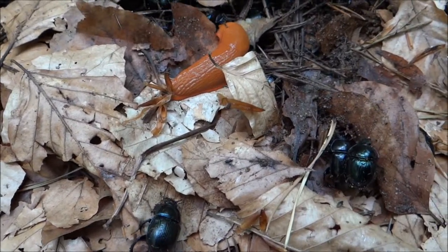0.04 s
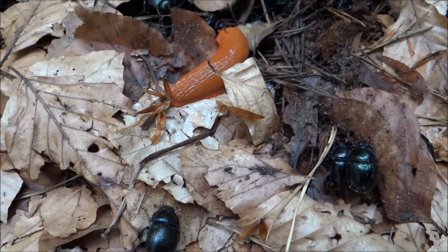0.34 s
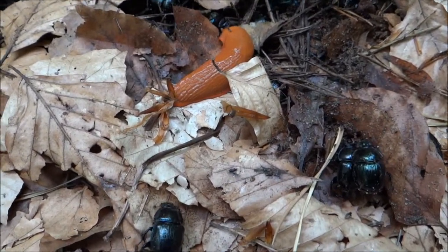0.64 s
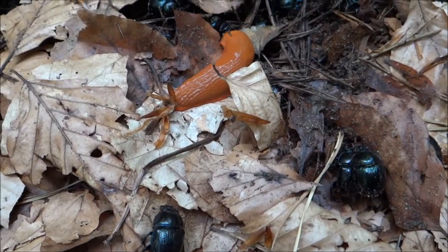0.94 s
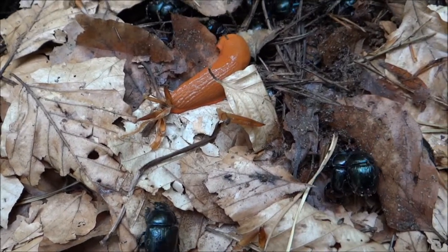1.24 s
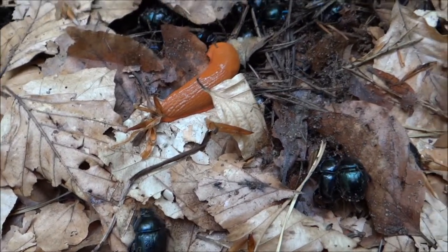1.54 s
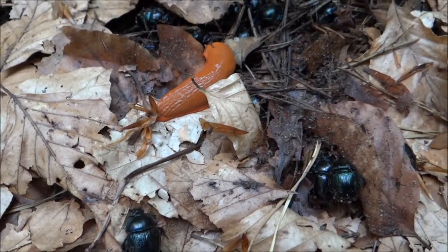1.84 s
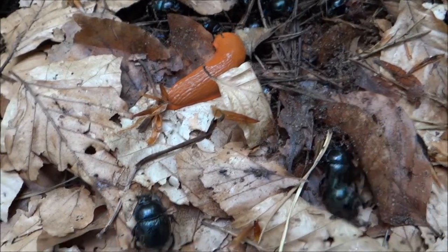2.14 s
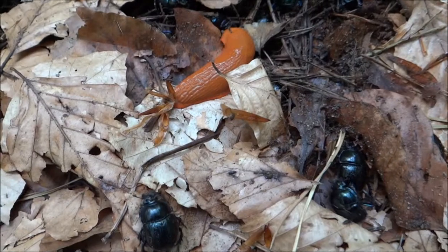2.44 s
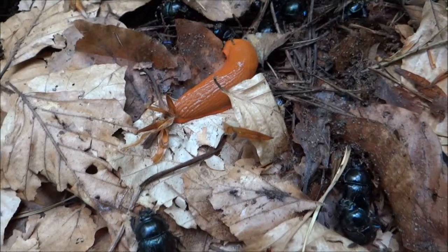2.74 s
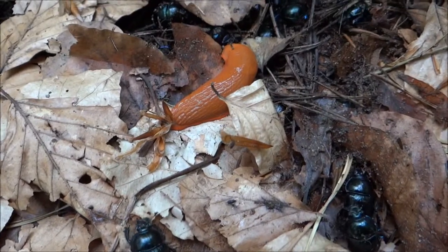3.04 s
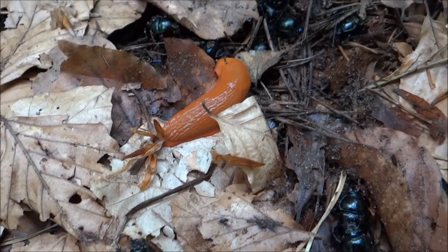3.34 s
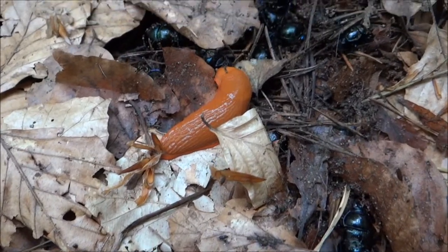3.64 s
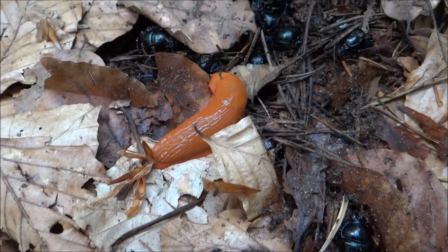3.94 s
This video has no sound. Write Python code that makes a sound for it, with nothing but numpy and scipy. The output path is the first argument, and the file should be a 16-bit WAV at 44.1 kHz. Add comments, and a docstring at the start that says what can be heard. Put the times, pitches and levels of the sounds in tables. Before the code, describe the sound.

A finch sings in a wood, its thin chirps growing into warbles, a loud falling trill and a buzzy flourish. A distant dry rattle comes first, and beetles faintly rustle fallen leaves close by over a low rumble.

```python
"""A finch in a wood

A finch sings a little to the right: seven thin chirps, warbled notes, a loud falling trill and a buzzy
flourish. Each is a nearly pure tone sliding in pitch, and the trunks scatter it into echoes.
Farther off come a dry rattle (pulsing hiss) and two thin whistles. Close by, beetles rustle
the fallen leaves. A low rumble and quiet air lie under it all."""
import sys
import numpy as np
from scipy import signal
from scipy.fft import rfft, irfft
from scipy.io import wavfile
from scipy.ndimage import uniform_filter1d

SR = 44100
rng = np.random.default_rng(int(sys.argv[2]) if len(sys.argv) > 2 else 0)


def int16_out(signal):
    """Quantize to a 16-bit WAV file."""
    q = np.round(np.clip(np.atleast_2d(signal).T, -1, 1) * 32767)
    wavfile.write(sys.argv[1], SR, q.astype(np.int16))


N = 176400  # 4 seconds

# How the rumble and its hum swell and fade. Each row: time in seconds, level in dB.
RUMBLE_LEVELS = [(0, -50), (.72, -47.5), (.88, -53), (1.25, -53), (1.5, -48.5), (1.6, -52), (1.8, -45),
                 (2.0, -52), (2.14, -44.5), (2.3, -49), (2.45, -44.5), (2.76, -55), (2.95, -45.5),
                 (3.28, -51), (3.52, -46), (4.0, -50.5)]
HUM_LEVELS = [(0, -50), (.72, -52), (.9, -73)]
# The tone of the rumble, of the air both ears share, and of the air that differs between them.
# Each row: frequency in Hz, boost or cut in dB.
RUMBLE_COLOUR = [(20, -25), (40, -7.5), (70, -3.5), (100, 1.5), (135, 4.5), (170, 2.5), (205, -1),
                 (260, -12.5), (350, -18), (600, -49)]
AIR_COLOUR = [(30, 0), (250, 4), (400, 3.5), (600, 1), (900, -1.5), (1020, 1), (1200, -3.5), (2000, -6.5),
              (4000, -10.5), (8000, -13.5), (11000, -14.5), (14000, -18), (16000, -23)]
AIR_SIDE_COLOUR = [(24, -30), (170, -4.5), (638, -9), (1040, -11), (4210, -26.5), (9230, -37), (14000, -82)]

# The rattle's pace. Each row: time in seconds, strokes per second, dB added to RATTLE_DB.
RATTLE_PACE = [(.38, 32, -20), (.46, 32, -7), (.72, 31.7, -1), (.94, 31.5, .5), (.98, 26.5, .5),
               (1.1, 25, -.5), (1.22, 21, -4.5), (1.38, 21, -19)]
# The note inside the rattle. Each row: time in seconds, pitch in Hz, level in dB next to the hiss.
RATTLE_RING = [(.55, 5280, -12), (.68, 5400, -1), (.8, 5600, -3), (.9, 6170, 2), (1.3, 6050, -1)]
# How loud the leaves rustle. Each row: time in seconds, level in dB.
RUSTLE_LEVELS = [(1.4, -91), (1.6, -67), (1.72, -72.5), (1.9, -61.5), (2.08, -58), (2.2, -70), (2.6, -73),
                 (3.0, -63.5), (3.9, -77)]
# Small leaf cracks. Each row: start in seconds, level in dB.
LEAF_CRACKS = [(2.237, -47.5), (2.244, -52.5), (2.298, -59)]
# The tone of the rattle, the rustle and the cracks. Each row: frequency in Hz, boost or cut in dB.
RATTLE_COLOUR = [(3000, -20), (4500, -6), (5400, -3), (6700, -1.5), (8400, -4.5), (9200, -13), (12000, -32)]
RUSTLE_COLOUR = [(2000, -2), (4500, 6), (7000, 2.5), (9000, 5.5), (11000, -5), (15000, -36)]
CRACK_COLOUR = [(800, -15), (2200, 4), (6000, 2), (10000, -4.5), (15000, -15)]

# The finch's chirps. Each row: time in seconds, level in dB.
CHIRPS = [(1.649, -49.5), (1.7295, -43.5), (1.8068, -38.5), (1.8845, -38), (1.963, -38.5), (2.0421, -37),
          (2.1211, -35)]
# Its warbles and its last flick. Each row: time in seconds, level in dB, pitch multiplier.
WARBLES = [(2.195, -46, .92), (2.260, -41, .94), (2.326, -38.5, .97), (2.390, -39, .97),
           (2.456, -36.5, .99), (2.518, -36, 1), (2.580, -35, 1.01), (2.642, -35.5, 1.01),
           (2.701, -34.5, 1)]
FLICKS = [(3.9855, -42.5, 0.91)]
# The trill's syllables (small groups of notes). Each row: time in seconds, level of the opening
# strokes in dB, level of the arch and falling slides in dB, pitch multiplier for the slides.
TRILLS = [(2.7104, -97, -31, 1.068), (2.8431, -27, -29.5, 1.027), (2.968, -23.5, -28.5, 1.035),
          (3.0922, -25, -29, 1.022), (3.2167, -25, -29, 1.007), (3.3426, -26, -30, .985),
          (3.4690, -29, -29.5, .98), (3.5936, -28.5, -29.5, 1)]
# The notes in one syllable. Each row: offset from the syllable's time in seconds, length in seconds,
# start, middle and end pitch in Hz (before the multiplier), dB added to the syllable's level.
CHIRP_NOTES = [(-.012, .013, 4950, 5280, 5700, -6.5), (-.002, .0095, 3950, 5350, 5650, -.5),
               (.011, .012, 6300, 5520, 5250, -10)]
WARBLE_STROKES = [(-.008, .005, 4400, 5000, 4700, -7), (-.003, .005, 5050, 5200, 4550, -.5),
                  (.002, .005, 5100, 4950, 4400, -3)]
WARBLE_RISES = [(.010, .009, 2750, 3350, 4100, -12.5), (.018, .012, 3450, 4150, 4550, -11.5)]
TRILL_STROKES = [(-.0135, .005, 4500, 5900, 6900, -19), (-.0095, .006, 6600, 5350, 3900, -8.5),
                 (-.0015, .0075, 4100, 5250, 5950, -5.5)]
TRILL_ARCH = [(.008, .010, 3900, 4700, 4150, -6)]
TRILL_FALLS = [(.0165, .019, 3980, 3340, 3150, -3), (.040, .015, 3450, 3060, 2690, -1),
               (.052, .011, 2780, 2580, 1950, -19)]
FLICK_NOTES = [(0, .008, 7300, 5800, 4600, 0)]
# The tone of the wood's echoes. Each row: frequency in Hz, boost or cut in dB.
ECHO_COLOUR = [(2000, 2), (2750, 1), (3350, -1.5), (4100, 4.5), (4700, 0), (5150, -8), (7000, -1)]
# The far low whistle and the finch's buzz. Each row: time in seconds, pitch in Hz, level in dB.
LOW_WHISTLE = [(2.165, 2900, -56), (2.185, 2850, -48), (2.21, 2717, -53), (2.31, 2730, -45.5),
               (2.45, 2700, -54), (2.58, 2740, -67)]
BUZZ_PATH = [(3.715, 2300, -58), (3.735, 2300, -51), (3.769, 2500, -52), (3.776, 2900, -35.5),
             (3.80, 3330, -38.5), (3.83, 3600, -44), (3.88, 4250, -40), (3.925, 4330, -44.5),
             (3.98, 4350, -58)]
# The thin high whistle. Each row: time in seconds, level in dB.
HIGH_WHISTLE = [(2.645, -63), (2.665, -54), (2.75, -61), (2.88, -64)]

HUM_HZ, AIR_DB = 165.5, -59
RATTLE_DB, STROKE_DECAY_S, STROKE_SMEAR = -56, .010, .4
CRACK_DECAY_S = .0047
NOTE_WAVER, NOTE_SCATTER = .011, .015  # as fractions of the pitch
OVERTONE_DB, HIGH_WHISTLE_HZ = -41, 6280
ECHO_FADE_S, ECHO_BUILD_S, ECHOES_PER_S = 1.01, .0039, 1500
BUZZ_RATE_HZ, BUZZ_SWING_HZ, BUZZ_JITTER = 185, 430, .24
RIGHT_LOUDER_DB, TOP_HZ = 3, 15700


def gain(db):
    """Turn decibels into a number to multiply a sound by."""
    return 10 ** (np.asarray(db) / 20)


def unit(x):
    """Scale a signal so its typical size (root mean square) is 1."""
    return x / np.sqrt(np.mean(x ** 2))


def curve(table, column=1):
    """Join one column of a table with straight lines over time."""
    rows = np.array(table, float)
    return np.interp(np.arange(N) / SR, rows[:, 0], rows[:, column])


def during(table):
    """1 between a table's first and last time, 0 outside, with soft edges."""
    t = np.arange(N) / SR
    return uniform_filter1d(1. * ((t > table[0][0]) & (t < table[-1][0])), size=200)


def colour(x, points):
    """Boost or cut each frequency as a colour table says."""
    hz, db = np.array(points, float).T
    freqs = np.maximum(np.fft.rfftfreq(2 * len(x), 1 / SR), 1)
    boost = gain(np.interp(np.log(freqs), np.log(hz), db))
    return irfft(rfft(x, 2 * len(x)) * boost)[:len(x)]


def noise(points):
    """Noise of size 1 with the tone of a colour table."""
    return unit(colour(rng.standard_normal(N), points))


def wander(rate):
    """A random curve of size 1 that heads for a new value `rate` times a second."""
    step = max(int(SR / rate), 2)
    targets = np.repeat(rng.standard_normal(N // step + 1), step)
    return unit(uniform_filter1d(targets, step)[:N])


def stereo(shared, side):
    """Make left and right; more `side` sounds wider."""
    return np.array([shared + side, shared - side])


def tone(hz, overtone_db=OVERTONE_DB):
    """A tone that follows a pitch curve, with a fainter one an octave up."""
    phase = 2 * np.pi * np.cumsum(hz) / SR
    return np.sin(phase) + gain(overtone_db) * np.sin(2 * phase)


def held_note(table, hz, waver):
    """A long, fluttering note whose level follows the table's last column."""
    level_db = curve(table, column=-1) + 2 * wander(70)
    return tone(hz * (1 + waver * wander(150))) * gain(level_db) * during(table)


def rumble():
    """Deep noise that swells and sinks, with a brief hum at the start."""
    return noise(RUMBLE_COLOUR) * gain(curve(RUMBLE_LEVELS)) + held_note(HUM_LEVELS, HUM_HZ, waver=.03)


def air():
    """The wide, nearly steady hush of still air."""
    return stereo(noise(AIR_COLOUR), noise(AIR_SIDE_COLOUR)) * gain(AIR_DB + .13 * wander(8.16))


def rattle():
    """Dry hissing strokes around a rising note; they slow as they fade, smeared by distance."""
    rate = curve(RATTLE_PACE)
    stroke_count = np.cumsum(rate * during(RATTLE_PACE)) / SR + .85
    since_stroke_s = stroke_count % 1 / rate
    power = np.exp(-since_stroke_s / STROKE_DECAY_S) * gain(1.7 * wander(30.1))
    strokes = np.sqrt(power + STROKE_SMEAR ** 2)  # the smear fills the gaps
    ring_hz = curve(RATTLE_RING) * (1 + .016 * wander(600))
    ring = tone(ring_hz) * wander(250) * gain(curve(RATTLE_RING, column=2))
    ringing_hiss = stereo(noise(RATTLE_COLOUR) + ring, .16 * noise(RATTLE_COLOUR))
    return ringing_hiss * strokes * gain(RATTLE_DB + curve(RATTLE_PACE, column=2))


def leaves():
    """Fallen leaves crackle as beetles crawl through them, with a few small cracks."""
    t = np.arange(N) / SR
    crackle = unit(gain(2.4 * wander(500))) * gain(curve(RUSTLE_LEVELS))
    rustle = stereo(noise(RUSTLE_COLOUR), .19 * noise(RUSTLE_COLOUR)) * crackle
    cracks = sum(gain(db) * (t > at) * np.exp(-np.abs(t - at) / CRACK_DECAY_S) for at, db in LEAF_CRACKS)
    return rustle + cracks * noise(CRACK_COLOUR)


def sing(syllables, notes, taper=.34, overtone_db=OVERTONE_DB):
    """Short curved pitch slides, never twice alike; more taper gives each note a narrower peak."""
    song = np.zeros(2 * N)
    waver = 1 + NOTE_WAVER * wander(500)
    for at, db, pitch in syllables:
        for offset, length, first, middle, last, note_db in notes:
            progress = np.linspace(0, 1, max(int(length * SR), 8))
            samples = int((at + offset) * SR) + np.arange(len(progress))
            points_hz = np.array([first, middle, last]) * (1 + NOTE_SCATTER * rng.standard_normal(3))
            slide_hz = np.polyval(np.polyfit([0, .5, 1], points_hz, 2), progress)
            note = tone(slide_hz * pitch * waver[samples % N], overtone_db)
            swell = np.abs(np.sin(np.pi * progress)) ** taper
            song[samples] += gain(db + note_db) * swell * note
    return song[:N] * gain(-wander(350))  # about 1 dB of flutter


def chirps():
    """Seven thin chirps that grow louder."""
    return [(sing([(at, db, 1) for at, db in CHIRPS], CHIRP_NOTES, taper=2.7), -3)]


def wood_echoes(x):
    """Many small echoes off trunks and treetops, dying away by 60 dB in ECHO_FADE_S."""
    t = np.arange(int(1.5 * SR)) / SR
    fade = (1 - np.exp(-t / ECHO_BUILD_S)) * gain(-60 * t / ECHO_FADE_S)
    echoes = []
    for _ in range(2):
        bounces = rng.standard_normal(len(t)) * (rng.random(len(t)) < ECHOES_PER_S / SR) * fade
        response = colour(bounces / np.linalg.norm(bounces), ECHO_COLOUR)
        echoes.append(signal.fftconvolve(x, response)[:N])
    return stereo(echoes[0], .21 * echoes[1])


def low_whistle():
    """A far-off whistle that dips, then holds its pitch."""
    return held_note(LOW_WHISTLE, curve(LOW_WHISTLE), waver=.014)


def warbles():
    """High strokes, then two rising slides; the last warble skips the slides and runs into the trill."""
    strokes = sing(WARBLES, WARBLE_STROKES, taper=1.3)
    lower_rise = sing(WARBLES[:-1], WARBLE_RISES[:1], overtone_db=-17)
    upper_rise = sing(WARBLES[:-1], WARBLE_RISES[1:])
    return [(strokes + lower_rise, -.5), (upper_rise, 7.5)]


def high_whistle():
    """A faint, thin whistle around one pitch."""
    return [(held_note(HIGH_WHISTLE, HIGH_WHISTLE_HZ, waver=.007), -5)]


def trill():
    """Each loud syllable has sharp high strokes, an up-and-down arch and falling slides."""
    strokes = sing([(at, db, 1) for at, db, _, _ in TRILLS], TRILL_STROKES, taper=6.4)
    arch = sing([(at, db, 1) for at, _, db, _ in TRILLS], TRILL_ARCH)
    falls = sing([(at, db, pitch) for at, _, db, pitch in TRILLS], TRILL_FALLS, taper=.8)
    return [(strokes, -6.5), (arch, -3.5), (falls, -1.5)]


def flourish():
    """A rising note buzzes as its pitch swings fast, wider as it climbs; a downward flick ends it."""
    swing_rate = BUZZ_RATE_HZ * (1 + BUZZ_JITTER * wander(120))
    swing = np.sin(2 * np.pi * np.cumsum(swing_rate) / SR)
    centre_hz = curve(BUZZ_PATH)
    hz = centre_hz + centre_hz / centre_hz.max() * BUZZ_SWING_HZ * swing + 70 * wander(900)
    buzz = tone(hz) * gain(curve(BUZZ_PATH, column=2) + 1.9 * wander(300)) * during(BUZZ_PATH)
    return [(buzz, -3), (sing(FLICKS, FLICK_NOTES), -6.5)]


def birds():
    """The song arrives directly and as echoes; the low whistle only as echoes."""
    # Each part is a pair: a sound, and how strongly it feeds the echoes in dB.
    parts = chirps() + warbles() + high_whistle() + trill() + flourish()
    direct = sum(sound for sound, _ in parts)
    into_trees = low_whistle() + sum(sound * gain(echo_db) for sound, echo_db in parts)
    balance = gain(np.array([[-RIGHT_LOUDER_DB], [RIGHT_LOUDER_DB]]) / 2)
    return (direct + wood_echoes(into_trees)) * balance


def scene():
    """Everything heard from the forest floor."""
    return rumble() + air() + rattle() + leaves() + birds()


def record(dry):
    """The recorder cuts the treble above TOP_HZ."""
    return signal.sosfilt(signal.ellip(10, .2, 70, TOP_HZ, fs=SR, output="sos"), dry)


dry = scene()
out = record(dry)
int16_out(out)
```